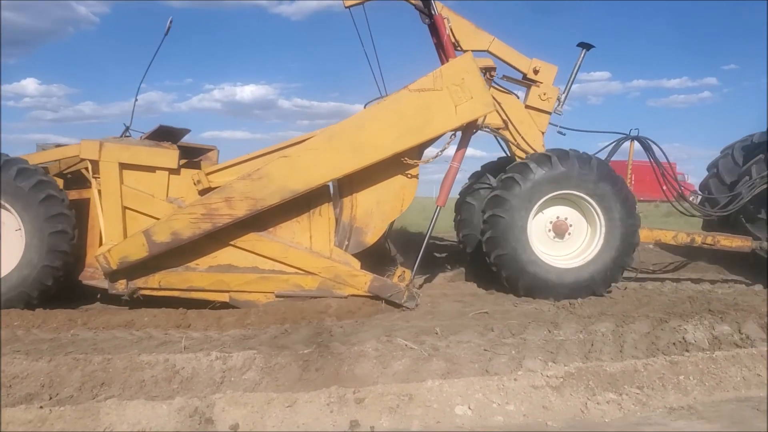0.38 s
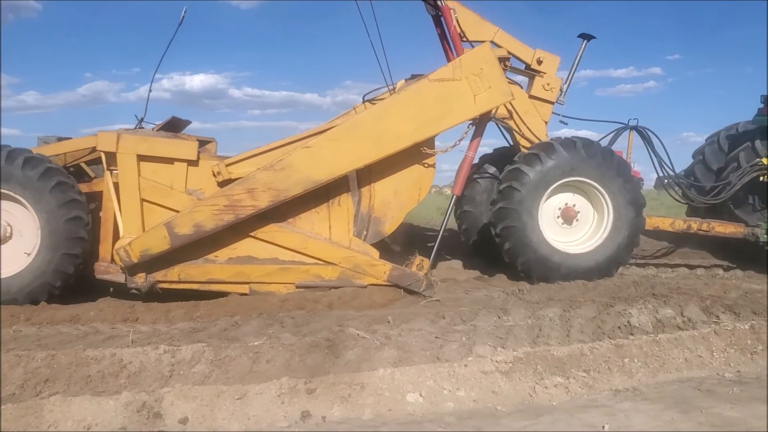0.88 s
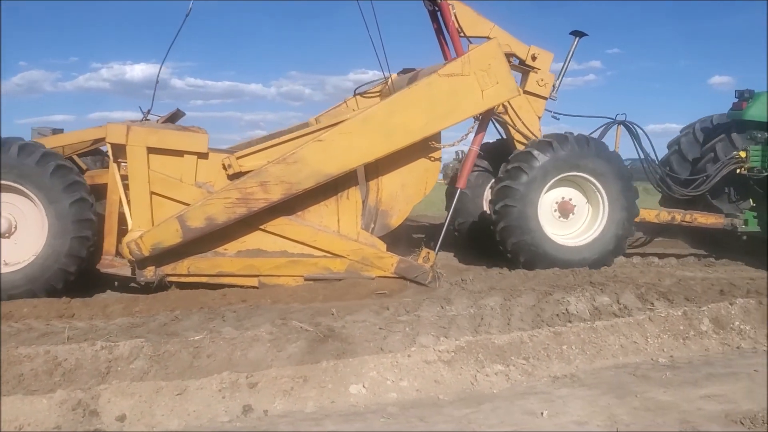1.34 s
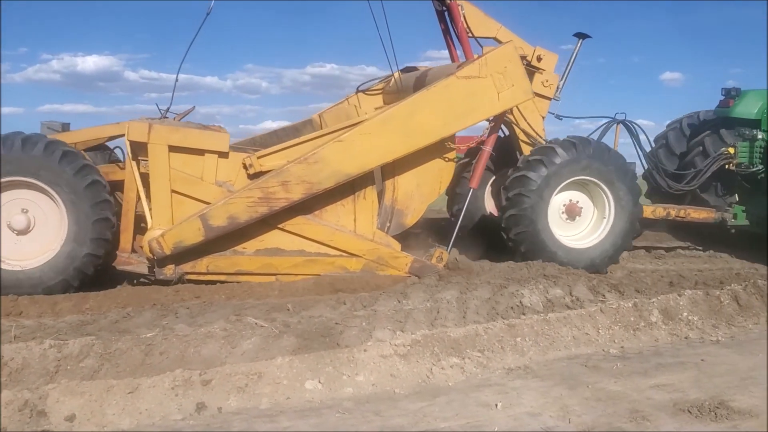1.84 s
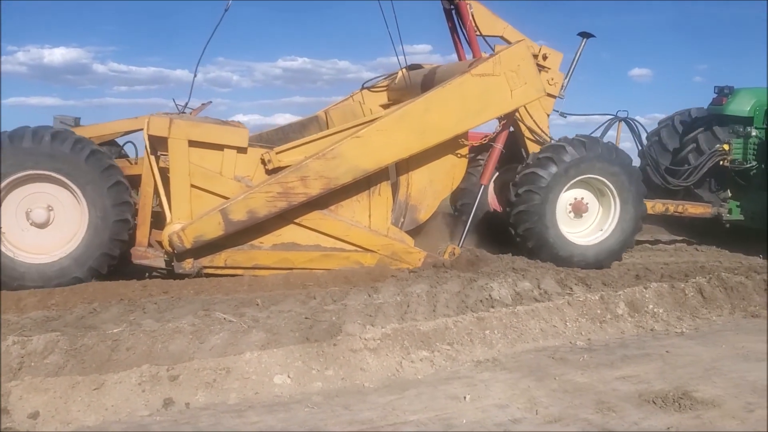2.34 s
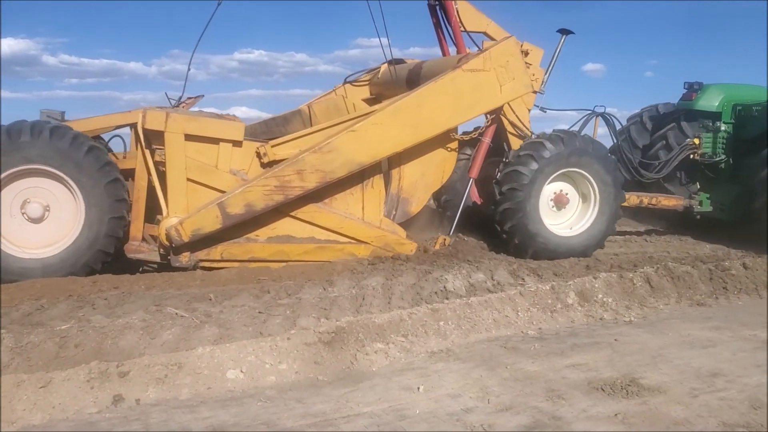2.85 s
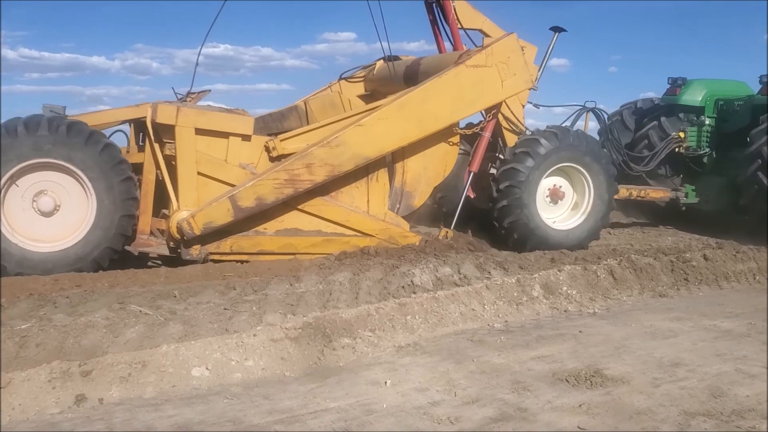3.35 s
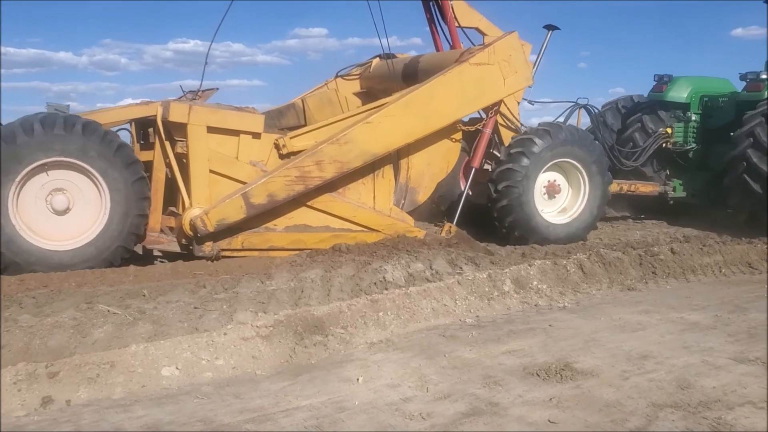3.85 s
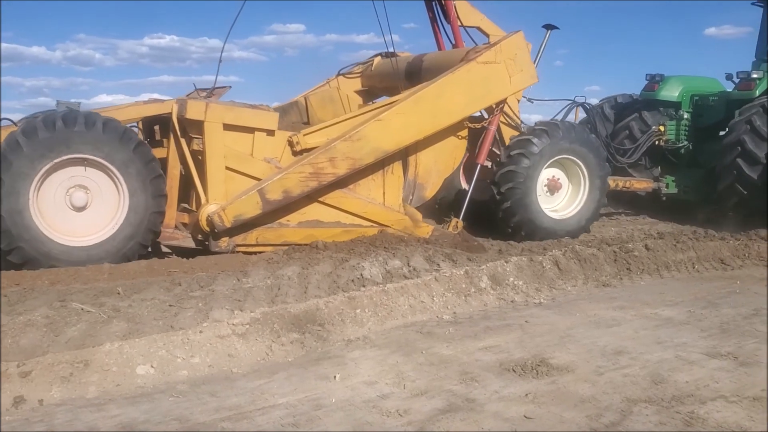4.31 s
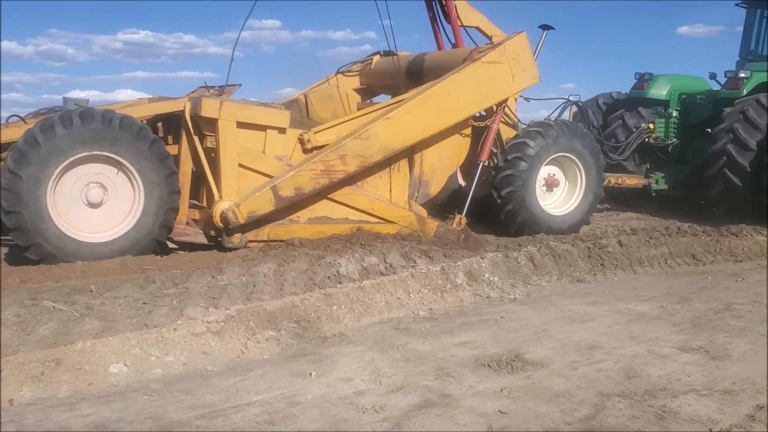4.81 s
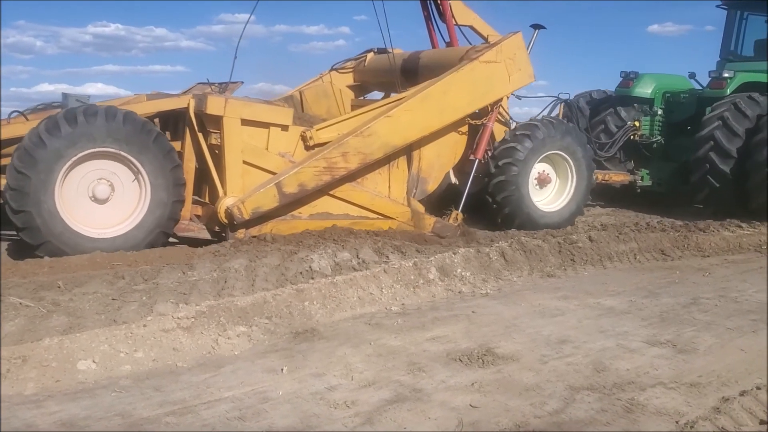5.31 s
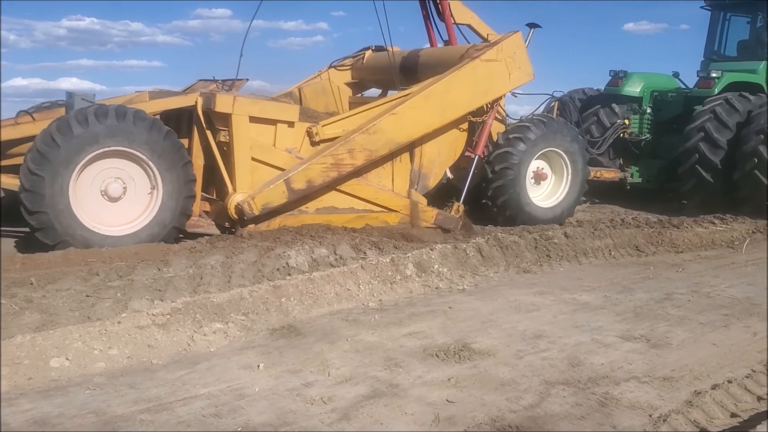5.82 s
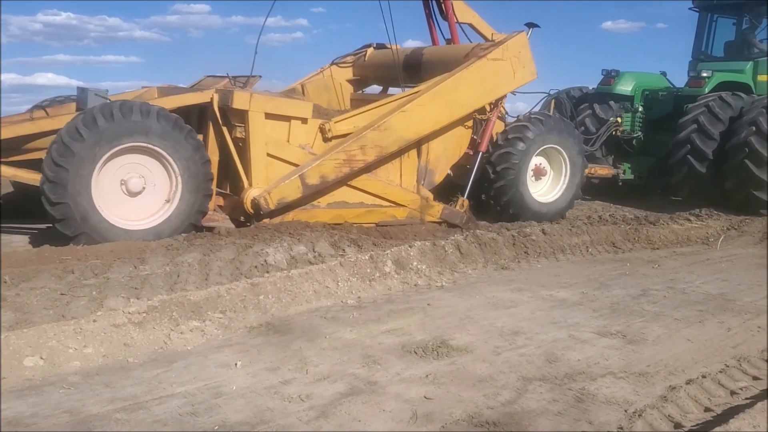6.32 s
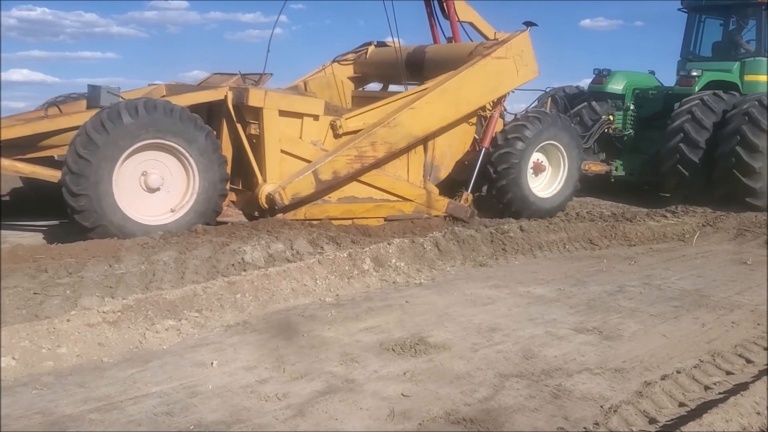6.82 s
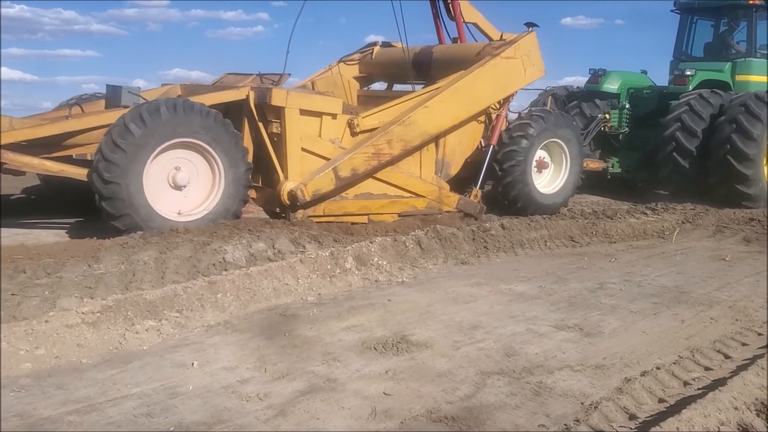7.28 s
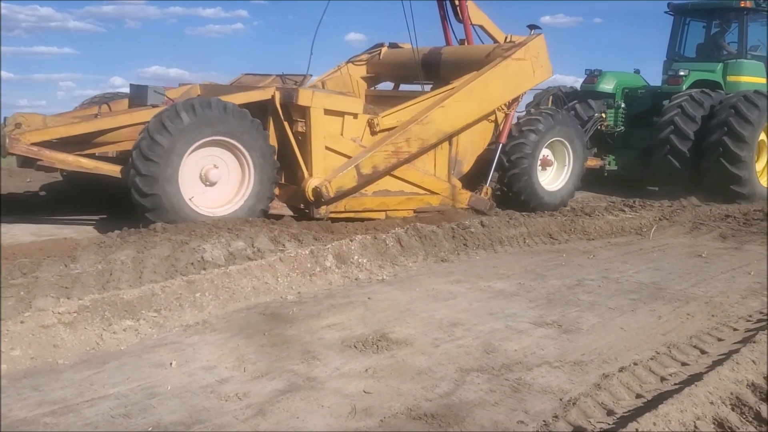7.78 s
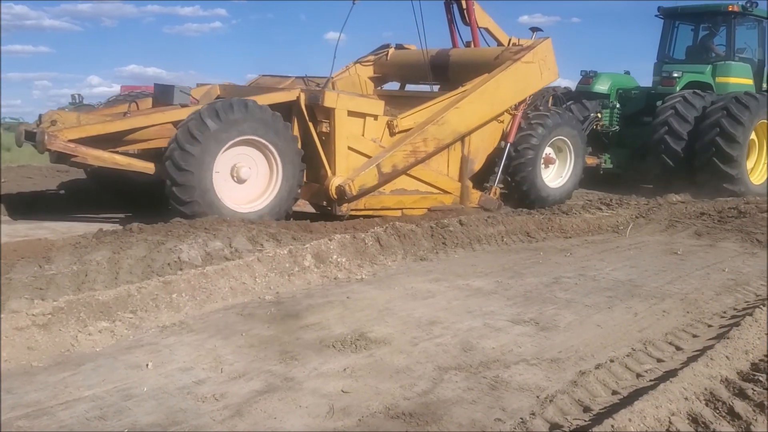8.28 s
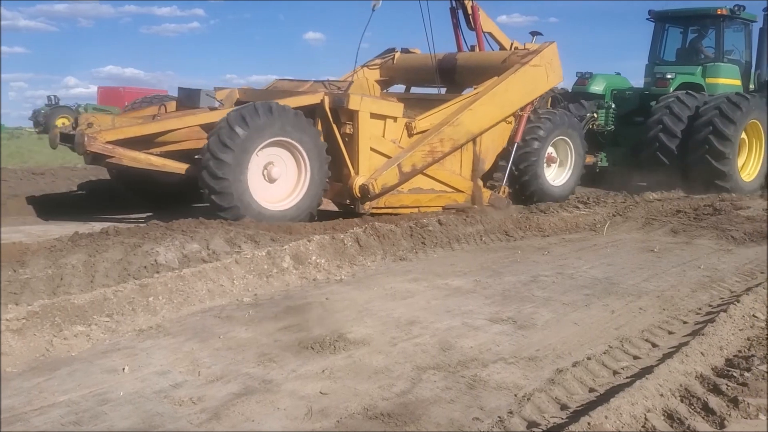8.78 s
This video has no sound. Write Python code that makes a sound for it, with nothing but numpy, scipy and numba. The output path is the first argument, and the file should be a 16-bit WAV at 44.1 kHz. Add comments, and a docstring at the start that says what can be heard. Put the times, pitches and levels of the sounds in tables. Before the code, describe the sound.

A heavy diesel works hard at close range in the open air, heard in stereo with its bright mechanical noise stronger on the right. The deep droning exhaust drops in pitch as the load bites, the firings becoming separate and knocking harder, then the revs rise again as the machine moves away. Dull earth rumble, brief gritty scrapes, faint very high ticks and early low wind thumps accompany it, without echo.

```python
"""Open dirt: a big diesel tractor drags a scraper away, lugging down under load and recovering.
The exhaust booms at harmonics of the firing rate; each firing rings the stack, knocks the block and spits gas.
The fan roars on as filtered noise, soil rumbles, stones grind, and a thin high tick comes in bouts.
A phone hears it from the right; wind noise buffets its two ports, the left one most."""
import sys
import numpy as np
from scipy import signal
from scipy.fft import rfft, irfft
from scipy.io import wavfile
from scipy.ndimage import uniform_filter1d, map_coordinates
from numba import njit

SR = 44100
rng = np.random.default_rng(int(sys.argv[2]) if len(sys.argv) > 2 else 0)


def wav_out(sig):
    """Save sig, one row per channel (or a flat mono array), as 16-bit PCM at SR to the path in sys.argv[1]."""
    wavfile.write(sys.argv[1], SR, np.round(np.clip(np.atleast_2d(sig).T, -1, 1) * 32767).astype(np.int16))


def to_linear_factor(level_db):
    """Convert decibel levels (scalar or array-like) to linear amplitude factors."""
    exponent = np.asarray(level_db, float) / 20
    return 10 ** exponent


N = 403515
T = np.arange(N) / SR
HZ = np.arange(N // 2 + 1) * SR / N + 1e-3  # the small offset keeps the logarithm finite

# engine speed: t/s, firing rate f/Hz
FIRING_RATE = [(0.0, 66.13), (0.62, 66.79), (1.53, 65.63), (1.83, 66.57), (2.45, 63.79), (3.18, 54.95),
               (3.88, 52.97), (4.17, 51.07), (4.77, 49.17), (5.19, 48.55), (5.63, 44.89), (6.02, 38.71),
               (6.52, 43.06), (7.04, 45.29), (7.2, 47.14), (7.78, 56.09), (7.95, 59.31), (9.15, 69.47)]
# how far the tractor has turned its back: t/s, share (0-1), lag of the left port/ms
TURNED = [(0, 0, 0.31), (2, 0, 0.29), (4, 0.28, 0.27), (6, 0.74, 0.26), (8, 0.83, 0.22), (9.15, 0.92, 0.18)]
# exhaust before the port gains: t/s, firing tone level/dB, stack ring level/dB, gas hiss level/dB
EXHAUST = [(0, -16.5, -41.5, -49.5), (.3, -13, -43, -52.5), (1.1, -15.5, -42, -50.5),
           (2.0, -15.5, -38.5, -51.5), (2.4, -14.5, -38, -46.5), (3.1, -16, -36, -47),
           (4.3, -17, -36.5, -49.5), (5.6, -18.5, -35, -49), (6.0, -22.5, -37, -50),
           (6.4, -21.5, -33.5, -50.5), (7.1, -19, -37, -50), (7.7, -15, -33.5, -52), (8.3, -15, -30.5, -53),
           (8.75, -14, -32, -52), (9.15, -14, -34.5, -53.5)]
# overtones let out by the silencer, against the firing tone: f/Hz, level side-on/dB, level from behind/dB
SILENCER_PASS = [(86.6, -5.5, -0.5), (97.6, -4, -6), (128.5, -14.5, -15.5), (137.3, -34.5, -13.5),
                 (140, -27.5, -19.5), (174, -24.5, -22.5), (202.3, -17, -15), (230, -34, -29),
                 (277, -29, -28)]
# how late the silencer lets each tone out after a firing: f/Hz, lag/cycles
SILENCER_LAG = [(40, .15), (66, .35), (80, .52), (105, .45), (125, .55), (150, .24), (165, .06), (185, 0),
                (200, .03), (265, -.3)]
# lines locked to the crankshaft, one turn in three firings: multiple of turn rate, level/dB
SHAFT_LINES = [(4, -37), (5, -39.5), (15, -54), (18, -54.5), (19, -57.5), (27, -49)]
# three unequal manifold runners: level side-on/dB, level from behind/dB, lead side-on/ms, lead from behind/ms
RUNNERS = [(0, 0, 0, 0), (1, 1, .45, .3), (-8, -12, 1., .7)]
# stack resonances: f/Hz, width/Hz, gain side-on/dB, gain from behind/dB
STACK_MODES = [(506.7, 25, 6, 1), (576, 69, 11.5, 0.5), (627, 82, -48, 14), (804, 39, 5, -13)]
# air intake resonances: f/Hz, width/Hz, gain side-on/dB, gain from behind/dB
INTAKE_MODES = [(828, 44, 4, -6), (401, 22, -5, -7)]
# ringing panels of block and hood: f/Hz, width/Hz, gain side-on/dB, gain from behind/dB
PANEL_MODES = [(2910, 76, 16, -10), (3046, 45, 10, 6), (3340, 24, 12, -30), (3660, 26, 10, -8),
               (3983, 105, 22.5, -1), (4250, 144, 17, 2), (4650, 120, -17, 16)]
# whistle bands of the stack mouth: f/Hz, width/Hz, gain side-on/dB, gain from behind/dB
NOZZLE_MODES = [(7270, 390, 0.5, -7), (11740, 760, -11.5, -2)]
# machine noise filter: f/Hz, gain/dB for left side-on, right side-on, left from behind, right from behind
PORT_COLOUR = [(880, -30, -20, -27, 2), (1246, -10.5, -5.5, -8, -7), (1984, -13, -1, -13, 0.5),
               (2510, -20.5, -6, -13, -3), (2970, -7, -4.5, -9, -2), (3070, -17, 1, -18, -3),
               (3690, -3.5, -3, -3, -7.5), (4076, -25, -22, -3, -0.5), (4800, -19, -16.5, -11, -11.5),
               (5350, -20, -21.5, -24, -17), (7000, -33.5, -15.5, -23.5, -8.5),
               (9040, -25.5, -16, -22, -10), (10900, -35, -23.5, -25, -17), (10900, -31, -17, -29, -17),
               (14600, -32, -23.5, -31, -22.5)]
# relative spectrum of running gear and blade in the soil: f/Hz, level per Hz/dB
SOIL_SPECTRUM = [(25, -21), (50, -5), (90, 5.5), (150, 1.5), (250, -3), (400, -13.5), (700, -12.5),
                 (1000, -23), (1500, -68), (4000, -110)]
# blade over a stone, before envelope and port gains: t/s, level/dB, length/s, from f/Hz, to f/Hz, width/Hz
GRINDS = [(2.288, -34.5, 0.049, 2110, 1490, 900), (2.29, -36.5, 0.057, 850, 800, 600),
          (5.114, -43, 0.061, 2410, 2100, 900), (7.887, -42, .055, 900, 700, 1400)]
# strong wind buffets, peak before the bass cut: t/s, left level/dB, right level/dB, length/s
BUFFETS = [(0.132, -17, -36, 0.043), (0.252, -19, -19, 0.035), (0.33, -23, -36, 0.05),
           (0.414, -13.5, -36, 0.045), (0.51, -15, -29, 0.099), (0.624, -27, -30, 0.036),
           (0.696, -17, -32, 0.049), (1.04, -25, -31, 0.066), (1.534, -15, -23, 0.038),
           (1.62, -28, -31, 0.051), (2.061, -10.5, -14, 0.041), (2.1, -20, -22, 0.06),
           (2.312, -28, -29, 0.056), (3.615, -29, -30, 0.18), (4.72, -23, -28, 0.051),
           (4.87, -29, -28, 0.088), (7.872, -18.5, -24, 0.13), (8.468, -26, -32, 0.091)]
# relative spectrum of wind turbulence: f/Hz, level per Hz/dB
WIND_SPECTRUM = [(15, -38), (45, 9), (90, 5), (180, -0.5), (300, -10), (450, -17), (800, -38), (3000, -110)]
# bouts of a thin high tick, perhaps an insect, before its band level and port gains:
# first t/s, last t/s, gap/s, first peak level/dB, slope/(dB/s)
TICK_BOUTS = [(0.092, .3, .092, -48, -73), (.642, 2., .0995, -55, -4), (2.46, 2.7, .09, -54, -5),
              (4.64, 5., .305, -59, -3)]

FULL_HZ = 66  # firing rate at full speed
FOURTH_DB = -5.5  # the fourth order of the firing rate sounds weaker
EVEN_BELOW_HZ, LUGGING_UNEVEN = 48, .35  # runners even out at low speed, down to this share of their dB
STACK_SHARP_PER_HZ, STACK_TUNED_HZ = 0.005, 59  # from behind, the stack rings higher as the engine speeds up
INTAKE_OVER_GAS_DB = 7
INTAKE_HIDDEN_DB, INTAKE_HIDES_S = -16.5, (5.5, 10)  # the body hides the intake over this time
KNOCK_DB, KNOCK_DB_PER_HZ_LOST = -48, 0.1151  # the block knocks harder as it lugs down
HOOD_HZ, HOOD_WIDTH_HZ = 3020, 170  # a panel heard from behind that sings near full speed
HOOD_DB, HOOD_DB_PER_HZ_LOST = -54.5, -0.61  # level when fully turned at full speed, before the fade-in
NOZZLE_SHARP_PER_DB, NOZZLE_TUNED_DB = .01, -50.5  # above this much gas the mouth whistles higher
FAN_DB, FAN_DB_PER_S = -43, -0.4251  # the fan fades with distance
BED_DULL_DB, BUFFET_BASS_DB = -6, -2.5  # the steady wind bed is duller, the buffets thinner
SMALL_BUFFET_DB, SMALL_SPREAD_DB, SMALL_LENGTH_S = -33.5, 1, .055
TICK_SPREAD_DB, TICK_JITTER_S = 2., .004


def level(x, db):
    """Root-mean-square scaling: the mean of the channels is brought to this level."""
    return x * to_linear_factor(db) / np.std(np.mean(np.atleast_2d(x), axis=0))


def curves(table):
    """Linear interpolation: columns of a time table at every sample."""
    s, *columns = np.transpose(table)
    return [np.interp(T, s, c) for c in columns]


def tint(x, hz, db):
    """Zero-phase spectral weighting through dB points on a log-frequency axis."""
    return irfft(rfft(x) * to_linear_factor(np.interp(np.log(HZ), np.log(hz), db)), N)


def band(x, lo_hz, hi_hz):
    """Butterworth band-pass with soft edges."""
    return signal.sosfilt(signal.butter(3, [lo_hz, hi_hz], "bandpass", fs=SR, output="sos"), x)


def walk(rate):
    """Slow random modulation: values held 1 / rate s and smoothed twice; spread near 1."""
    k = int(SR / rate)
    held = np.repeat(rng.standard_normal(N // k + 1), k)
    return 1.09 * uniform_filter1d(uniform_filter1d(held, k), k)[:N]


def bumps(s, db, length):
    """Gaussian swells at given moments; length spans about three standard deviations."""
    return sum(to_linear_factor(d) * np.exp(-.5 * (3.2 * (T - t) / w) ** 2) for t, d, w in zip(s, db, length))


def later(x, ms):
    """Propagation delay, which may change with time."""
    return map_coordinates(x, [np.arange(N) - ms * SR / 1000], order=3, mode="nearest")


@njit
def svf(x, hz, width):
    """State-variable resonator: a band-pass whose centre may move, gain 1 at the centre."""
    y, b, l = np.empty(len(x)), 0., 0.
    for i in range(len(x)):
        g, k = np.tan(np.pi * hz[i] / SR), width / hz[i]
        v = (b + g * (x[i] - l)) / (1 + g * (g + k))
        b, l, y[i] = 2 * v - b, l + 2 * g * v, k * v
    return y


def resonate(x, modes, turned, sharp=0, wander_db=0):
    """Modal superposition: mode gains wander and follow the turning; sharp raises all modes by a share."""
    tune = 1 + sharp + 0 * T
    gains = [to_linear_factor(side_db + turned * (rear_db - side_db) + wander_db * walk(3.02))
             for _, _, side_db, rear_db in modes]

    def ring(v):
        return sum(gain * svf(v, hz * tune, 1. * width) for gain, (hz, width, *_) in zip(gains, modes))

    return ring(x) if x.ndim == 1 else np.array([ring(v) for v in x])


def puffs(cycles, hz, rise_ms, steady, scatter_db):
    """Periodic amplitude modulation: a swell of its own size at each firing, over a steady part."""
    begun = cycles + rise_ms / 1000 * hz
    since = begun % 1 / hz * 1000 / rise_ms  # time since the swell began, in rise times
    size = to_linear_factor(scatter_db * np.clip(rng.standard_normal(N // 100), -3, 2))[begun.astype(int)]
    return steady + size * since ** 2 * np.exp(2 - 2 * since)


def at_ports(drive, turned, alike):
    """Partial coherence: noise coloured for each port, the left with a partly unrelated copy."""
    hz, *db = np.transpose(PORT_COLOUR)
    first, second = drive * rng.standard_normal((2, N))
    alike = np.clip(alike, 0, 1)
    ports = (alike * first + np.sqrt(1 - alike ** 2) * second, first)
    return np.array([(1 - turned) * tint(x, hz, db[k]) + turned * tint(x, hz, db[k + 2])
                     for k, x in enumerate(ports)])


def boom(cycles, hz, turned, count=4):
    """Harmonic series of the firing rate, filtered by the silencer, its levels unsteady."""
    lag_hz, lag = np.transpose(SILENCER_LAG)
    pass_hz, side_db, rear_db = np.transpose(SILENCER_PASS)
    out = 0
    for k in range(1, count + 1):
        side = np.interp(k * hz, pass_hz, side_db)
        rear = np.interp(k * hz, pass_hz, rear_db)
        db = (k > 1) * ((1 - turned) * side + turned * rear)  # the firing tone itself is the reference
        db = db + FOURTH_DB * (k == 4) + 0.7 * k * walk(30)
        phase = k * cycles - np.interp(k * hz, lag_hz, lag)
        out = out + to_linear_factor(db) * np.cos(2 * np.pi * phase)
    return np.sqrt(2) * out


def shaft(cycles):
    """Rotational harmonics: thin wavering tones at multiples of the crankshaft's turn."""
    return sum(np.sqrt(2) * to_linear_factor(db + 1.5 * walk(2.7)) * np.cos(2 * np.pi * round(k) * cycles / 3)
               for k, db in SHAFT_LINES)


def stack(fired, hz, turned, lead_ms=3.3, lead_ms_per_hz=.092, scatter_db=1.8, jitter_ms=.08, rough=.55):
    """Impulse-driven resonance: firings ring the stack in a pattern of three, roughened by rushing gas."""
    size_chance, time_chance = rng.standard_normal((2, len(fired)))
    side_db, rear_db, side_ms, rear_ms = np.array(RUNNERS)[np.arange(len(fired)) % 3].T
    share = np.interp(fired, T, turned)
    rate = np.interp(fired, T, hz)
    uneven = np.interp(rate, [EVEN_BELOW_HZ, FULL_HZ], [LUGGING_UNEVEN, 1])
    db = uneven * (side_db + share * (rear_db - side_db)) + scatter_db * size_chance
    # the faster the gas, the sooner the stack answers
    early_ms = lead_ms + lead_ms_per_hz * rate + side_ms + share * (rear_ms - side_ms) + jitter_ms * time_chance
    place = np.clip((fired - early_ms / 1000) * SR, 0, N - 2)
    pulses = np.zeros(N)
    # each pulse is shared between its two nearest samples
    np.add.at(pulses, place.astype(int), to_linear_factor(db) * (1 - place % 1))
    np.add.at(pulses, place.astype(int) + 1, to_linear_factor(db) * (place % 1))
    drive = level(pulses, 0) + rough * (1 - 0.14 * turned) * rng.standard_normal(N)
    sharp = STACK_SHARP_PER_HZ * turned * (hz - STACK_TUNED_HZ)
    ring = resonate(drive, STACK_MODES, turned, sharp)
    return level(band(band(ring, 476, 749), 458, 950), 0)


def intake(cycles, hz, turned):
    """Duct resonance: air gulped once a firing makes a hollow rush."""
    gulps = puffs(cycles + 0.416, hz, 1.9, 1.4, 1.8)
    air = gulps * to_linear_factor(2. * walk(6.4)) * rng.standard_normal(N)
    return level(band(resonate(air, INTAKE_MODES, turned), 293, 850), -0.19)


def block(cycles, hz, turned):
    """Forced structural vibration: firings knock the block, its panels and a hood panel."""
    lost_hz = FULL_HZ - hz
    knock = band(at_ports(puffs(cycles + .05, hz, 2.2, .55 - .15 * turned, 3.4), turned, .78), 2700, 5500)
    hood = np.array([svf(v, HOOD_HZ + 0 * T, 1. * HOOD_WIDTH_HZ) for v in knock])
    hood = level(hood, HOOD_DB) * turned * to_linear_factor(HOOD_DB_PER_HZ_LOST * lost_hz)
    knock = knock + resonate(knock, PANEL_MODES, turned, 0.0072 * walk(1.5), 3.0)
    return level(knock, 0) * to_linear_factor(KNOCK_DB + KNOCK_DB_PER_HZ_LOST * lost_hz) + hood


def gas_hiss(cycles, hz, turned, gas_db):
    """Jet noise: gas spat at each firing whistles at the stack mouth, over a rush without puffs."""
    spit = puffs(cycles + .055, hz, 4.8, .85 - .5 * turned, 2.8)
    gas = band(at_ports(spit, turned, 0.17), 5080, 21500)
    sharp = NOZZLE_SHARP_PER_DB * np.maximum(gas_db - NOZZLE_TUNED_DB, 0)
    gas = gas + resonate(gas, NOZZLE_MODES, turned, sharp, 1.5)
    rush = band(at_ports(to_linear_factor(1.5 * walk(4)), turned, 0.3), 9500, 21000)
    return (level(gas, 0) + level(rush, -15.5)) * to_linear_factor(gas_db)


def fan(cycles, hz, turned):
    """Broadband flow noise: a roar swelling a little with each firing and fading with distance."""
    drive = to_linear_factor(1.1 * walk(5)) * puffs(cycles + .2, hz, 4., 4., 2.)
    roar = band(at_ports(drive, turned, .78), 900, 2700)
    return level(roar, 0) * to_linear_factor(FAN_DB + FAN_DB_PER_S * T)


def soil(turned):
    """Random rolling and friction excitation: running gear and blade rumble in the soil."""
    rumble = level(tint(rng.standard_normal(N), *np.transpose(SOIL_SPECTRUM)), -32.5)
    return rumble * to_linear_factor(2.4 * walk(6) - 3.7 * turned)


def stone():
    """Friction noise through a sliding resonance: short gritty bursts whose colour slides down."""
    out = 0
    for s, db, length, from_hz, to_hz, width in GRINDS:
        hz = np.interp(T, [s - length / 2, s + length / 2], [from_hz, to_hz])
        grit = svf(svf(rng.standard_normal(N), hz, 1. * width), hz, 1. * width)
        out = out + level(grit, db) * np.exp(-np.abs(2 * (T - s) / length) ** 3)
    return out


def wind(count=20):
    """Incoherent low turbulence on each port: a fluttering bed, strong buffets and many small ones."""
    left_chance, right_chance, length_chance = rng.standard_normal((3, count))
    when = (np.arange(count) + rng.random(count)) * T[-1] / count
    small_length = SMALL_LENGTH_S * np.exp(0.46 * length_chance)
    s, left_db, right_db, length = np.transpose(BUFFETS)
    ports = []
    for bed_db, buffet_db, chance in ((-35, left_db, left_chance), (-37, right_db, right_chance)):
        air = level(tint(rng.standard_normal(N), *np.transpose(WIND_SPECTRUM)), 0)
        bed = level(tint(air, [70, 200], [0, BED_DULL_DB]), 0) * to_linear_factor(bed_db + 2.0 * walk(5.1))
        small = bumps(when, SMALL_BUFFET_DB + SMALL_SPREAD_DB * chance, small_length)
        thin_air = tint(air, [50, 120], [BUFFET_BASS_DB, 0])
        ports.append(bed + thin_air * (small + bumps(s, buffet_db, length)))
    return np.array(ports)


def ticks():
    """Narrow-band noise pulses: high chirrups, mostly on the right; the first short bout fades fast, the later
    ones stay nearly even."""
    bouts = []
    for first, last, gap, first_db, slope in TICK_BOUTS:
        t = np.arange(first, last, gap)
        bouts.append([t, first_db + slope * (t - first)])
    s, db = np.hstack(bouts)
    time_chance, size_chance = rng.standard_normal((2, len(s)))
    tone = level(band(rng.standard_normal(N), 13450, 13950), -4)
    swells = bumps(s + TICK_JITTER_S * time_chance, db + TICK_SPREAD_DB * size_chance, np.full(len(s), .024))
    return tone * swells * np.array([[.2], [1.8]])


def scene():
    """Superposition at the two ports: tractor, soil, wind and ticks."""
    hz, = curves(FIRING_RATE)
    boom_db, ring_db, gas_db = curves(EXHAUST)
    turned, lag_ms = curves(TURNED)
    intake_db = gas_db + INTAKE_OVER_GAS_DB + np.interp(T, INTAKE_HIDES_S, [0, INTAKE_HIDDEN_DB])
    cycles = .37 + np.cumsum(hz) / SR
    fired = np.interp(np.arange(1, int(cycles[-1]) + 1), cycles, T)  # moments of the firings
    low = boom(cycles, hz, turned) * to_linear_factor(boom_db) + shaft(cycles)
    ring = stack(fired, hz, turned) * to_linear_factor(ring_db) + intake(cycles, hz, turned) * to_linear_factor(intake_db)
    machine = block(cycles, hz, turned) + gas_hiss(cycles, hz, turned, gas_db) + fan(cycles, hz, turned)
    rumble = soil(turned)
    grit = stone()
    # the phone's body shades the left port from the middle up, and long waves bend round it more slowly
    left = to_linear_factor(.5) * (later(low, 0.32) + rumble) + to_linear_factor(-2) * later(ring, 0.12) + to_linear_factor(-8) * grit + machine[0]
    right = low + rumble + to_linear_factor(2.0) * ring + to_linear_factor(3.0) * grit + machine[1]
    return np.array([later(left, lag_ms), right]) + wind() + ticks()


def top_cut(x):
    """Nothing passes above the cut-off."""
    return signal.sosfilt(signal.butter(12, 15740, fs=SR, output="sos"), x)


def record(dry):
    """Gain control: a wind suppressor lowers the left port's treble when the ports disagree in the bass."""
    disagreement = band(dry[0] - dry[1], 108, 400)
    buffet = np.sqrt(uniform_filter1d(disagreement ** 2, int(0.06 * SR)))
    duck = np.minimum(1, to_linear_factor(-23) / (buffet + 1e-9))
    treble = tint(dry[0], [4000, 6000], [-40, 0])
    left = dry[0] - (1 - duck) * treble
    left = tint(left, [14800, 15300], [0, -20])  # the left port's top end is dull
    return top_cut(np.array([left, dry[1]]))


dry = scene()
out = record(dry)
wav_out(out)
```